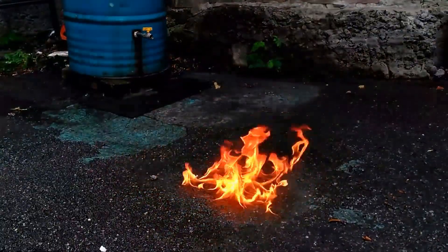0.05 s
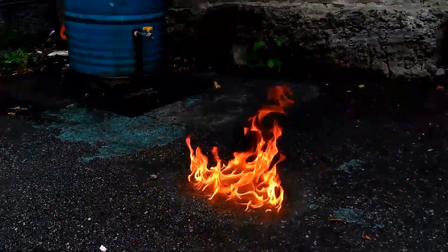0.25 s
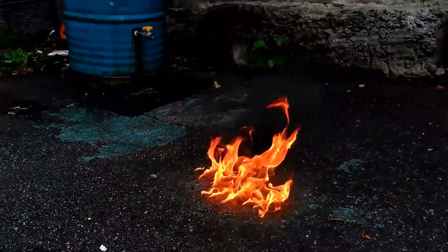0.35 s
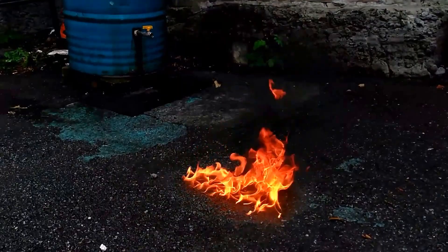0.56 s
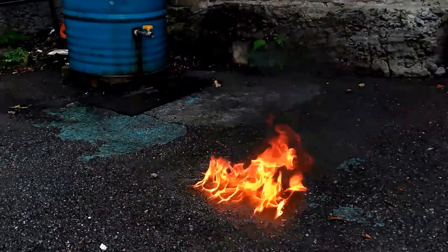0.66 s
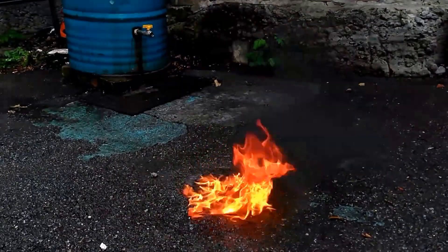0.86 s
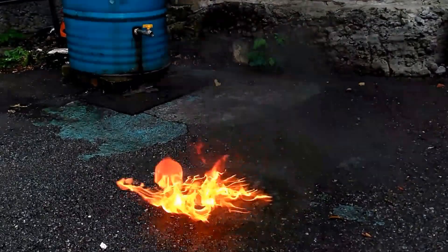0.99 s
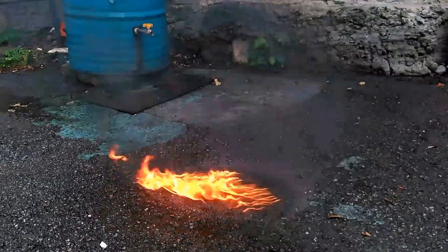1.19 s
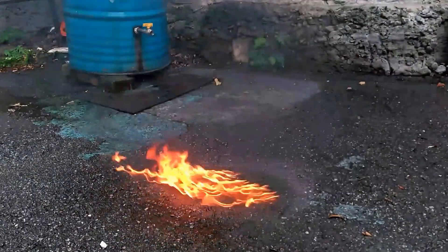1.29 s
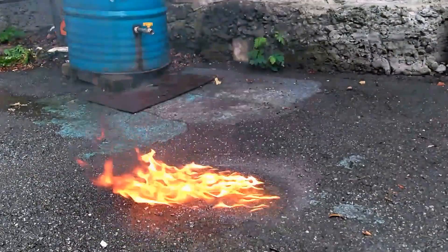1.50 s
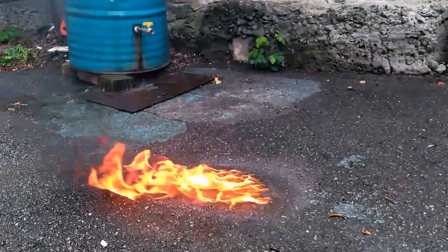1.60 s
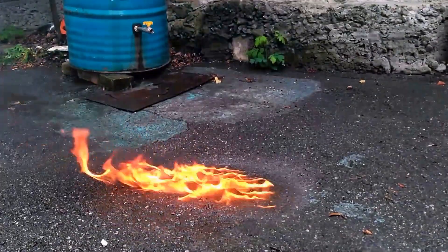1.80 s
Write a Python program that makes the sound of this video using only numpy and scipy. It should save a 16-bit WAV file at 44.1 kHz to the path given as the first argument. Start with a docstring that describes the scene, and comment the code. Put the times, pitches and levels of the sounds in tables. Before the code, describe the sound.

Flames rumble and flutter softly throughout, over a faint hiss. The fire swells at 0.2 seconds with a tiny spit and a low thump of air on the microphone; lighter puffs follow until 0.5. It sinks around 0.7 to 1.1, then swells again with puffs near 1.3 and 1.6. Faint droplet ticks and mostly rising bubble blips are scattered throughout, echoing briefly, the blips clustering near 1.8.

```python
"""A low, fluttering rumble of flames: a puddle of fuel burns on wet asphalt in a walled yard.
Gusts tear at the fire, and now and then a puff of air thumps the microphone. Surfacing bubbles
blip, mostly rising in pitch, droplets tick and the fuel spits, over a faint hiss.
The walls answer the blips and ticks with a brief echo."""
import sys
import numpy as np
from scipy import signal
from scipy.fft import rfft, irfft, next_fast_len
from scipy.io import wavfile
from scipy.ndimage import uniform_filter1d, map_coordinates

SR = 44100
rng = np.random.default_rng(int(sys.argv[2]) if len(sys.argv) > 2 else 0)


def transcribe(u):
    """Save the signal u as a 16-bit wav file named by the first command-line argument.

    u: samples, shape (n,) or (channels, n), limited to [-1, 1]; the rate is SR.
    q: integer samples, one column per channel.
    """
    v = np.clip(np.atleast_2d(u).T, -1, 1)
    q = np.round(v * 32767).astype(np.int16)
    wavfile.write(sys.argv[1], SR, q)


N = 81585


def amp(db):
    """Decibels to gain."""
    return 10 ** (np.asarray(db) / 20)


def unit(x):
    """Normalise to rms 1."""
    return x / np.sqrt(np.mean(x ** 2) + 1e-20)


def along(points, hz):
    """Read (frequency, value) breakpoints on a log frequency axis."""
    f, v = np.transpose(points)
    return np.interp(np.log(hz + 1), np.log(f + 1), v)


def automation(rows):
    """Draw (time, value) breakpoints as one value per sample."""
    return np.interp(np.arange(N) / SR, *np.transpose(rows))


def since(start):
    """Seconds since start, zero before."""
    return np.maximum(np.arange(N) / SR - start, 0)


def wobble(rate):
    """A smooth random modulator with rate knots a second."""
    return map_coordinates(rng.standard_normal(4096), [np.arange(N) * rate / SR], mode="wrap")


def filtered(x, response):
    """EQ x with a gain given as a function of frequency."""
    size = next_fast_len(N + SR // 2)
    return irfft(rfft(x, size) * response(np.fft.rfftfreq(size, 1 / SR)), size)[..., :N]


def low_cut(hz, corner_hz):
    """Gain of a 30 dB per octave high-pass."""
    return 1 / np.sqrt(1 + (corner_hz / (hz + 1)) ** 10)


def noise(spectrum):
    """Coloured noise of rms 1."""
    return unit(filtered(rng.standard_normal(N), lambda hz: amp(along(spectrum, hz))))


def steady(x):
    """Compress the chance swells of a noise, then normalise to rms 1."""
    power = np.abs(signal.hilbert(x)) ** 2
    swell = np.abs(uniform_filter1d(power, size=SR // 40)) + 1e-3
    return unit(x / swell ** .42)


def patchy(x, depth_db):
    """Let each narrow band drift in level, for some tens of milliseconds at a time."""
    bands = signal.stft(x, nperseg=256)[2]
    drift = uniform_filter1d(rng.standard_normal(bands.shape[1:]), size=5, axis=0)
    drift = uniform_filter1d(drift, size=14, axis=1)
    return signal.istft(bands * amp(depth_db * unit(drift)), nperseg=256)[1][:, :N]


def rough_tone(hz, waver_hz, tremble, rate):
    """A sine with random vibrato and tremolo."""
    phase = 2 * np.pi * np.cumsum(hz + waver_hz * wobble(rate)) / SR
    return (1 + tremble * wobble(rate)) * np.sin(phase)


# stereo image: how alike left and right are (frequency [Hz], coherence [0-1])
STEREO_IMAGE = [(3500,1),(6000,0.98),(9000,0.18),(14000,0.4)]
def spread(a, b, mono_below_hz=2900):
    """Two unrelated signals as mid and side: mono in the bass, wide in the treble."""
    def mid_side_gains(hz):
        angle = np.arccos(np.clip(along(STEREO_IMAGE, hz), -1, 1)) / 2
        return np.array([np.cos(angle), np.sin(angle) * (hz > mono_below_hz)])
    mid, side = filtered(np.array([a, b]), mid_side_gains)
    return np.array([mid + side, mid - side])


# tone of the yard's air and of the hiss (frequency [Hz], relative level [dB])
AIR_EQ = [(60,-25.5),(300,6),(800,2),(1400,-3.5),(2300,1),(3500,-7),(5500,-7),(7000,-43)]
HISS_EQ = [(1500,-25),(3500,-7),(5400,1),(6600,-2.5),(8500,-6.5),(11000,-11),(14000,-13.5)]
# fader ride on the hiss (time [s], level before trim [dB])
HISS_RIDE = [(0.092, -77.5), (1.168, -81.5), (1.462, -85.5), (1.664, -82), (1.85, -84)]
def hiss(trim_db=5.5, air_db=-70):
    """The bed: a faint, shifting sizzle over the steady air of the yard."""
    sizzle = patchy(spread(noise(HISS_EQ), noise(HISS_EQ)), depth_db=2.5)
    air = spread(noise(AIR_EQ), noise(AIR_EQ))
    return sizzle * amp(automation(HISS_RIDE) + trim_db) + amp(air_db) * air


# reverb time of the yard (frequency [Hz], t60 [s])
YARD_DECAY = [(300,0.41),(1500,0.51),(5000,0.23),(12000,0.27)]
def wall_echo(send, build_s=0.0057):
    """The walls' diffuse answer, shorter in the treble."""
    hz, t, bands = signal.stft(rng.standard_normal((2, SR // 2)), SR, nperseg=256)
    decay = amp(-60 * t / along(YARD_DECAY, hz)[:, None])
    tail = signal.istft(bands * decay, SR, nperseg=256)[1]
    tail *= np.minimum(np.arange(tail.shape[1]) / SR / build_s, 1)
    tail /= np.linalg.norm(tail[0])
    return spread(*signal.fftconvolve(send[None], tail, axes=1)[:, :N])


def snap(start, db, t60, attack_s=0.00063):
    """A percussive envelope: sharp attack, exponential decay."""
    t = since(start)
    return amp(db - 60 * t / t60) * (1 - np.exp(-t / attack_s))


# spits of fuel (time [s], level [dB], t60 [s])
SPIT_CUES = [(0.232,-70.5,0.32),(1.184,-70,0.27)]
# their bright tone (frequency [Hz], relative level [dB])
SPIT_EQ = [(2500,-29),(5000,-2),(9000,10),(14000,-5)]
def fuel_spits():
    """Fuel spits suddenly and sizzles out."""
    envelope = sum(snap(start, db, t60) for start, db, t60 in SPIT_CUES)
    return envelope * spread(noise(SPIT_EQ), noise(SPIT_EQ))


# droplets (time [s], level [dB], pitch [Hz], bandwidth [Hz], t60 [s], splash against ring [dB])
DROPLET_CUES = [(0.0614,-64,4680,678,0.028,2),(0.0866,-55.5,4950,710,0.032,-7),(0.1412,-55.5,5520,497,0.027,-11),(0.2314,-48.5,5000,553,0.014,-13),(0.254,-62,5150,626,0.26,-5.5),
                (0.4335,-60,3340,222,0.081,-7),(0.885,-49,3160,152,0.043,-13),(0.898,-65.5,6800,756,0.06,-20),(0.936,-57.5,5200,403,0.03,-12),(1.1847,-58,5320,400,0.0192,-24),
                (1.243,-66,4400,523,0.12,-24),(1.324,-54,4330,460,0.03,-20),(1.646,-54.5,1960,383,0.11,-24),(1.649,-59,4200,725,0.12,-25)]
# tone of their splash (frequency [Hz], relative level [dB])
SPLASH_EQ = [(500,-8),(2500,1),(5000,-3.5),(8000,-4.5),(14000,-25)]
def droplet_ticks():
    """Each droplet ticks: a short high ring with a little splash."""
    out, splash = np.zeros(N), noise(SPLASH_EQ)
    for start, db, hz, width_hz, t60, splash_db in DROPLET_CUES:
        ring = rough_tone(hz, width_hz / 2, tremble=0.56, rate=1300)
        out += snap(start, db, t60) * (ring + amp(splash_db) * splash)
    return out


# bubbles (time [s], level [dB], start pitch [Hz], end pitch [Hz], glide length [s], waver [Hz])
BUBBLE_CUES = [(0.219,-61.5,722,873,0.021,90.5),(0.361,-50.5,741.6,984,0.013,59.5),(0.372,-57,1049,1183,0.016,135),(0.793,-59.5,914,900,0.009,30),(0.804,-60,2288,2420,0.027,130),(0.961,-50.5,564,588,0.017,34.8),
               (0.981,-53.5,643,983,0.0198,49.6),(1.363,-53,968,1116,0.01,89.6),(1.376,-52.5,1220,1187,0.0095,69.26),(1.576,-57,730.5,1193,0.0171,171.4),(1.587,-58.5,1360,1460,0.02,228.5),
               (1.701,-62,804,871,0.044,28.8),(1.761,-51.5,880,1157,0.0188,89.7),(1.776,-51.5,1650,1680,0.0057,121.5),(1.788,-62,1790,1613,0.021,304.4),(1.804,-47,905,890,0.009,25.4)]
# tone of their slosh (frequency [Hz], relative level [dB])
SLOSH_EQ = [(200,-21),(450,6.5),(900,-12),(1600,-4.5),(2400,-14),(4000,-28.5)]
def bubble_blips(attack_s=0.0021, sag_db=6, release_t60_s=0.025, slosh_db=-17.5):
    """Bubbles ring and glide in pitch as they reach the surface, each with a little slosh."""
    out, slosh = np.zeros(N), amp(slosh_db) * noise(SLOSH_EQ)
    for start, db, start_hz, end_hz, length, waver_hz in BUBBLE_CUES:
        t = since(start)
        glide = np.minimum(t / length, 1)
        level_db = db - sag_db * glide - 60 * since(start + length) / release_t60_s
        ring = rough_tone(start_hz + (end_hz - start_hz) * glide, waver_hz, tremble=0.34, rate=440)
        out += amp(level_db) * np.minimum(t / attack_s, 1) * (ring + slosh)
    return out


# gusts in the flames (centre time [s], level [dB], length [s])
GUST_CUES = [(0.682,-60.5,0.022),(1.273,-66,0.27),(1.431,-61.5,0.041)]
# their low-mid whoosh (frequency [Hz], relative level [dB])
GUST_EQ = [(130,-26),(290,1.5),(520,0.5),(1700,-41)]
def gusts():
    """A gust tears at the flames: a fuller rush that swells and fades."""
    t = np.arange(N) / SR
    swells = sum(amp(db) * np.exp(-(2 * (t - centre) / length) ** 2) for centre, db, length in GUST_CUES)
    return swells * steady(noise(GUST_EQ))


# thumps of air on the microphone (centre time [s], peak before filtering [dB], pitch [Hz])
PUFF_CUES = [(0.2414,-21,86.8),(0.3049,-36,72),(0.3725,-35,83),(0.411,-36,69),(0.477,-29.5,99.3),(0.682,-46.5,127),(1.248,-42,61.4),(1.2875,-42,127),(1.596,-35,65)]
def air_puffs(cut_hz=53.7, damping=0.96):
    """Each puff is one swing of pressure; the microphone's bass cut makes it rebound."""
    def microphone(hz):
        loss = 1j * damping * hz * cut_hz
        rebound = loss / (cut_hz ** 2 - hz ** 2 + loss)  # a broad resonance at the corner
        return (1 + rebound) * low_cut(hz, cut_hz)
    pressure = np.zeros(N)
    for centre, db, hz in PUFF_CUES:
        phase = np.pi * hz * (np.arange(N) / SR - centre)
        pressure += amp(db) * (1 - 2 * phase ** 2) * np.exp(-phase ** 2)
    return filtered(pressure, microphone)


# tone of the fire's two layers (frequency [Hz], relative level [dB])
RUMBLE_EQ = [(20,-35.5),(32,-15),(44,5.5),(62,0.5),(85,0.5),(130,-17),(200,-32.5),(700,-84)]
FLUTTER_EQ = [(60,-34.5),(120,0.5),(180,0),(290,-8.5),(480,-20.5),(900,-28.5),(1800,-59),(5000,-108)]
# their fader rides (time [s], level before trim [dB])
RUMBLE_RIDE = [(0, -54), (0.16, -53), (0.21, -38), (0.26, -36), (0.335, -48.5), (0.45, -45), (0.51, -40.5),
               (0.555, -54), (0.68, -55.5), (0.74, -65), (0.88, -58), (1.01, -54.5), (1.07, -66),
               (1.17, -60.5), (1.24, -48.5), (1.34, -52), (1.52, -46.5), (1.58, -55), (1.76, -44),
               (1.85, -58)]
FLUTTER_RIDE = [(0, -65), (0.17, -60.5), (0.22, -57), (0.3, -49.5), (0.34, -62.5), (0.39, -52),
                (0.47, -57.5), (0.55, -70.5), (0.68, -59.5), (0.75, -68), (0.89, -72.5), (0.975, -52.5),
                (1.13, -66.5), (1.28, -52.5), (1.43, -56), (1.53, -64), (1.85, -69.5)]
def flames(rumble_trim_db=-0.5, flutter_trim_db=-1.5, flicker_db=4.5):
    """Flames in the breeze: a low rolling rumble and a quicker flutter above it."""
    rumble = steady(noise(RUMBLE_EQ)) * amp(automation(RUMBLE_RIDE) + rumble_trim_db)
    flutter = unit(steady(noise(FLUTTER_EQ)) * amp(flicker_db * wobble(rate=45.03)))
    return rumble + flutter * amp(automation(FLUTTER_RIDE) + flutter_trim_db)


def scene(blip_send_db=-9, tick_send_db=-4.5):
    """Mix fire, air and liquid; only the blips and ticks feed the echo."""
    blips, ticks = bubble_blips(), droplet_ticks()
    send = amp(blip_send_db) * blips + amp(tick_send_db) * ticks
    return flames() + gusts() + air_puffs() + blips + ticks + fuel_spits() + hiss() + wall_echo(send)


def record(dry, bass_cut_hz=31.6, top_hz=14255):
    """The microphone cuts the deepest bass and keeps nothing above its band limit."""
    return filtered(dry, lambda hz: (hz < top_hz) * low_cut(hz, bass_cut_hz))


dry = scene()
out = record(dry)
transcribe(out)
```